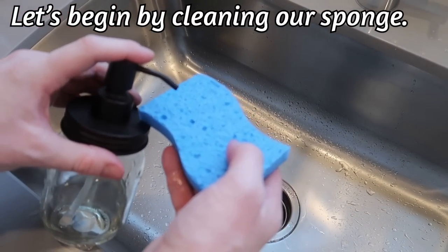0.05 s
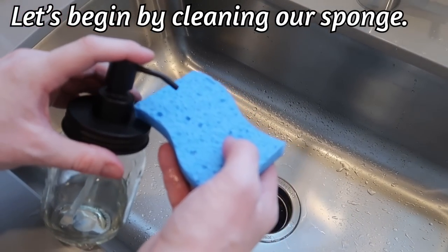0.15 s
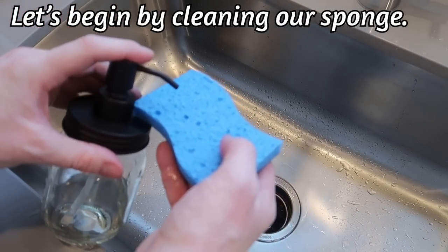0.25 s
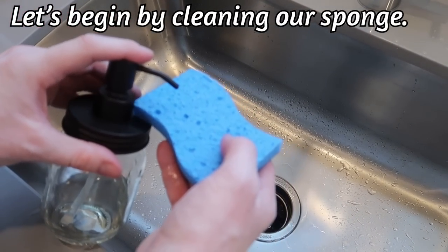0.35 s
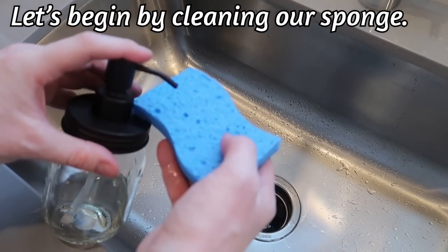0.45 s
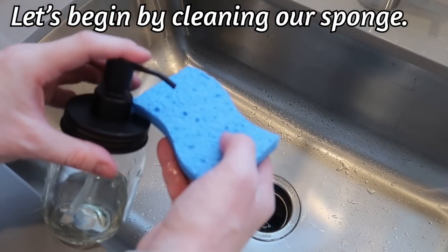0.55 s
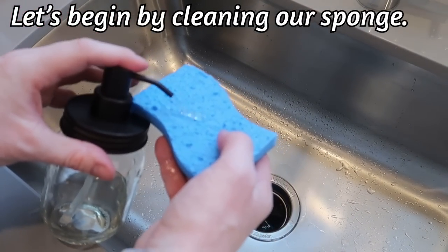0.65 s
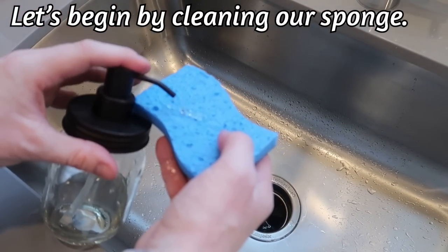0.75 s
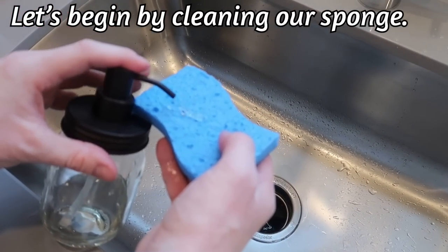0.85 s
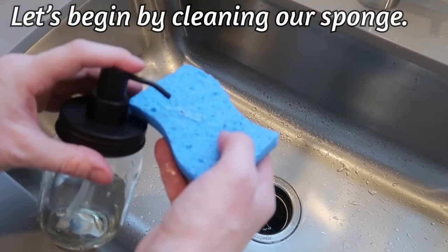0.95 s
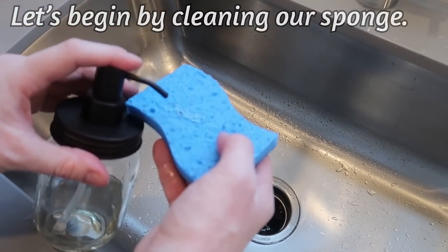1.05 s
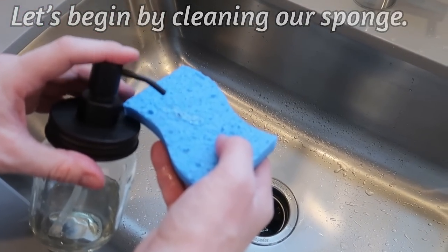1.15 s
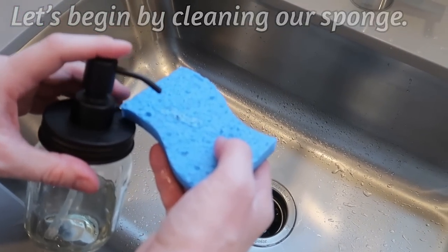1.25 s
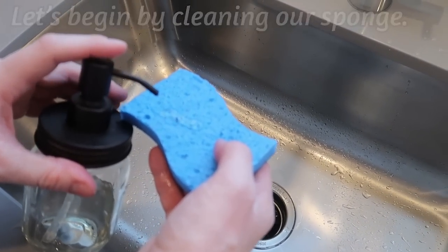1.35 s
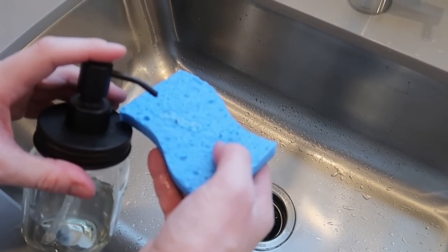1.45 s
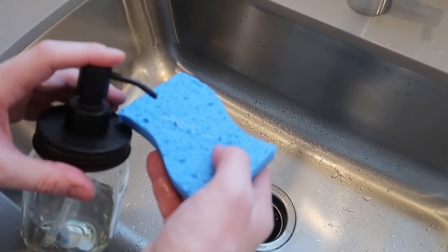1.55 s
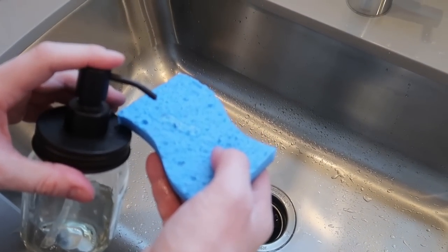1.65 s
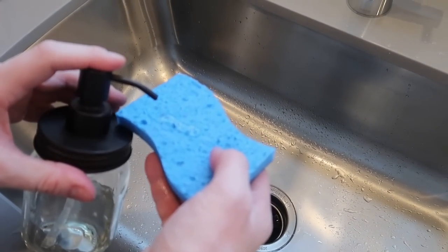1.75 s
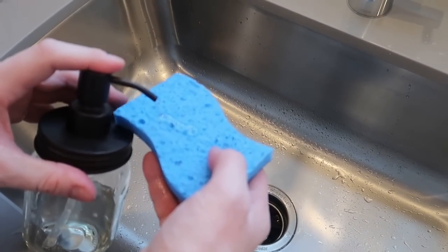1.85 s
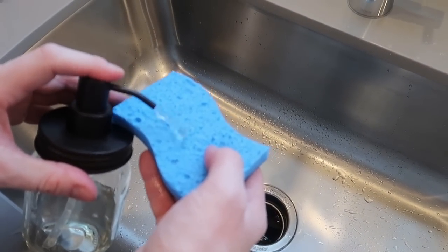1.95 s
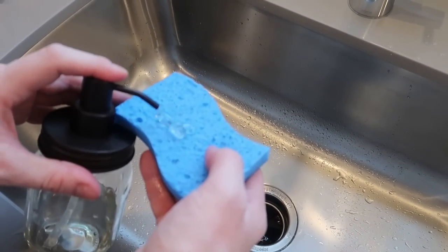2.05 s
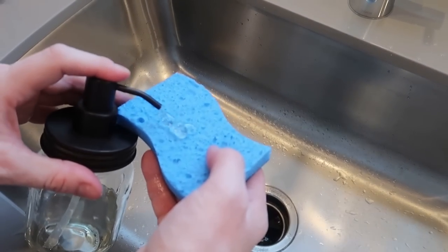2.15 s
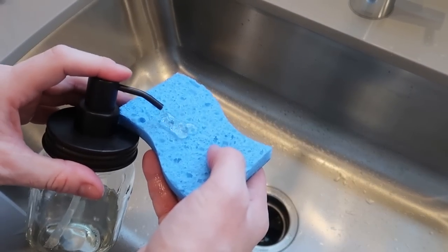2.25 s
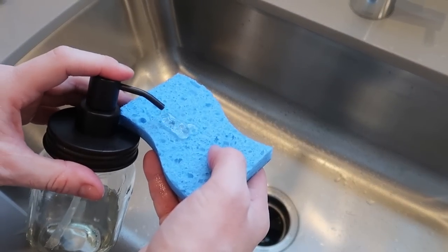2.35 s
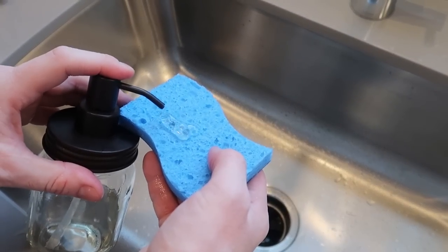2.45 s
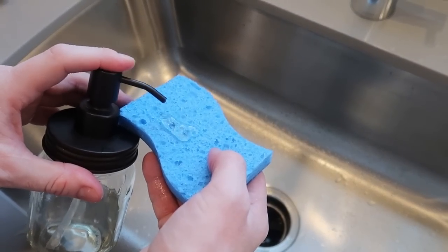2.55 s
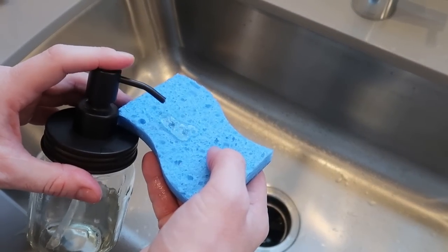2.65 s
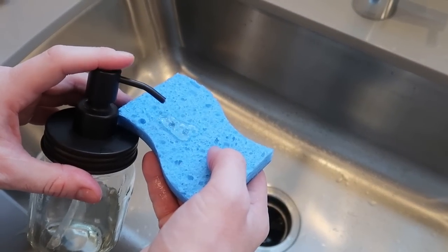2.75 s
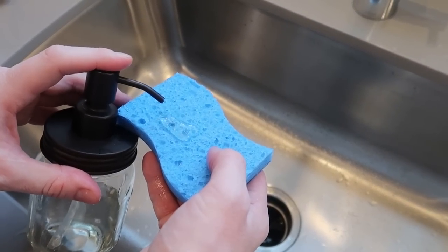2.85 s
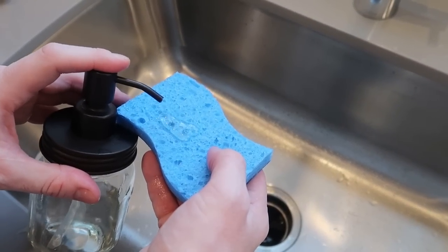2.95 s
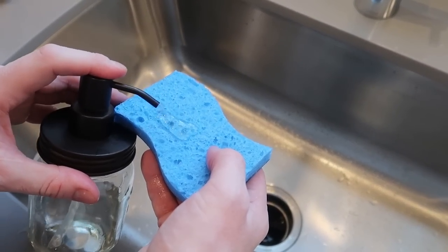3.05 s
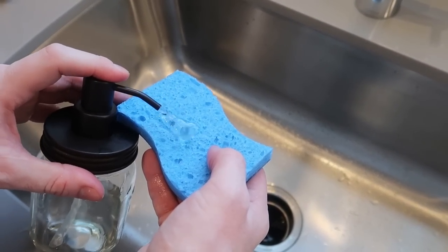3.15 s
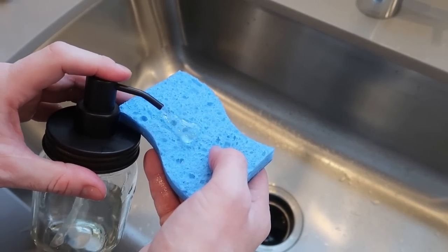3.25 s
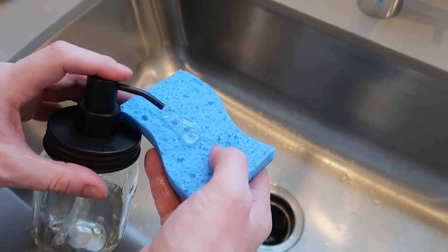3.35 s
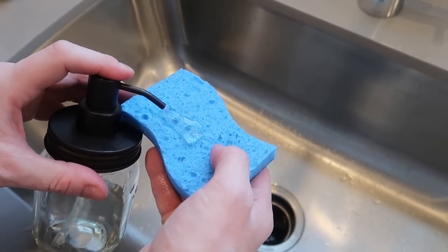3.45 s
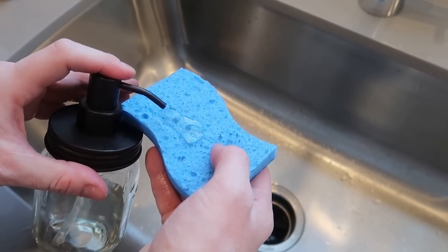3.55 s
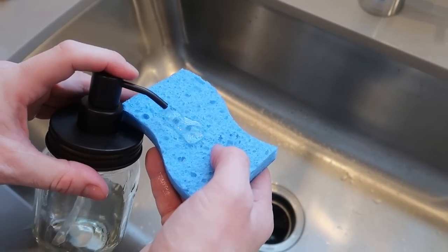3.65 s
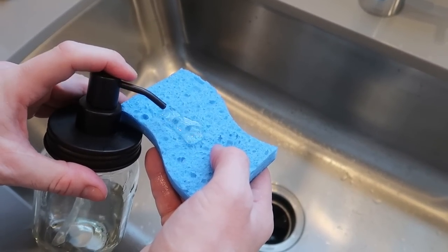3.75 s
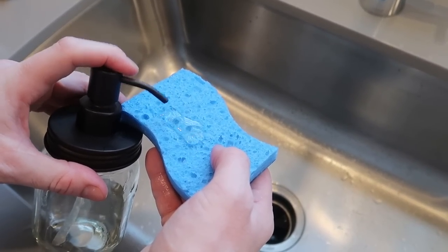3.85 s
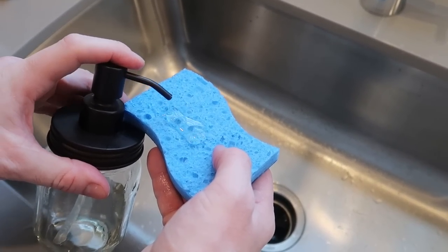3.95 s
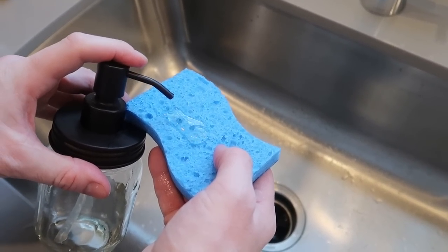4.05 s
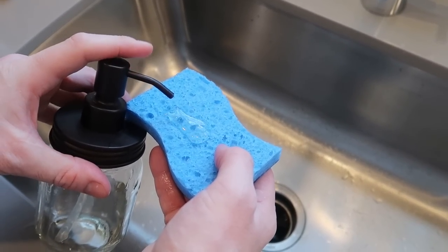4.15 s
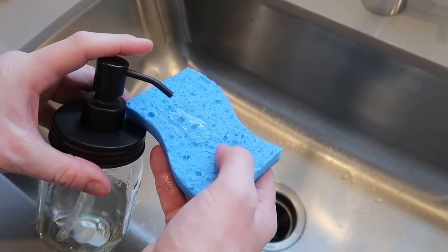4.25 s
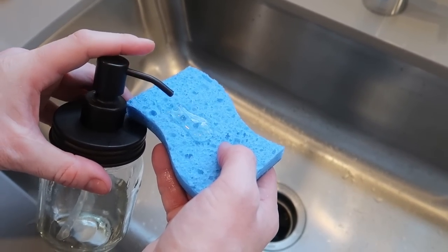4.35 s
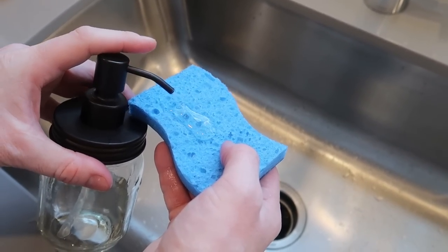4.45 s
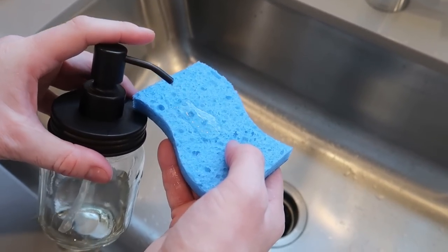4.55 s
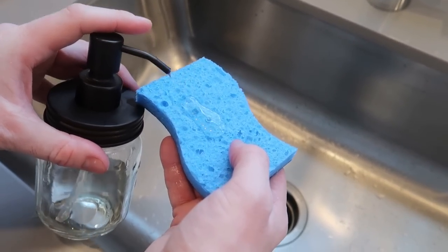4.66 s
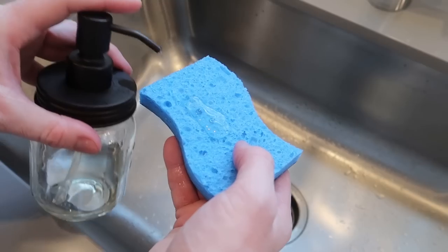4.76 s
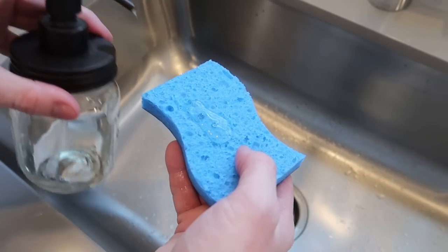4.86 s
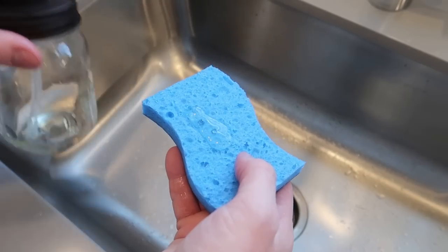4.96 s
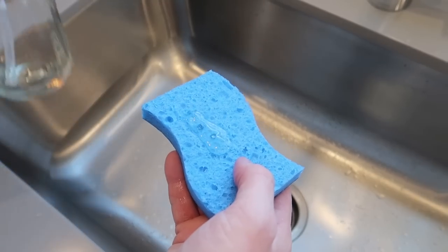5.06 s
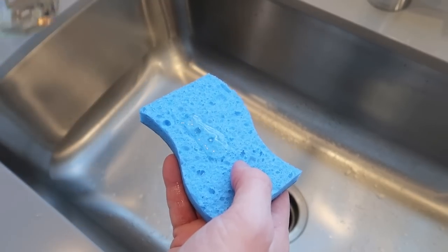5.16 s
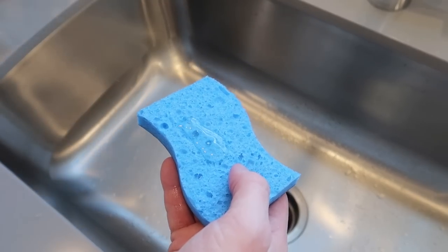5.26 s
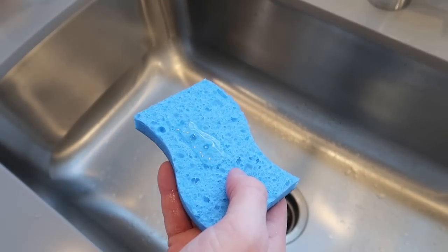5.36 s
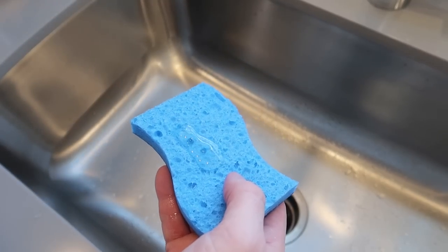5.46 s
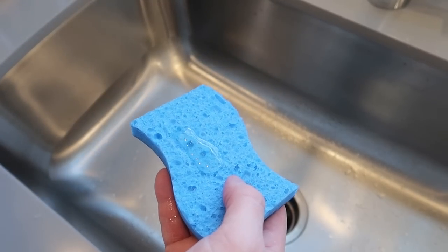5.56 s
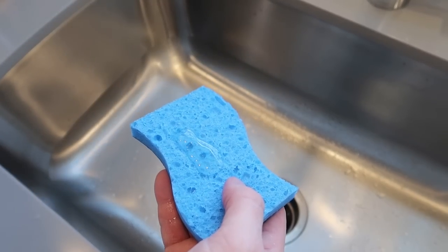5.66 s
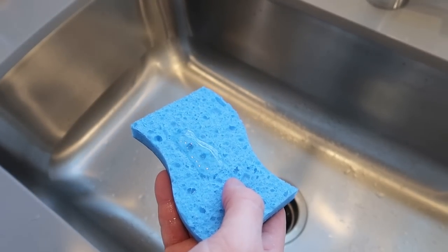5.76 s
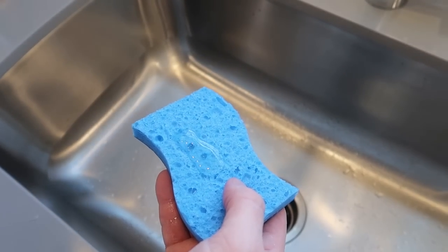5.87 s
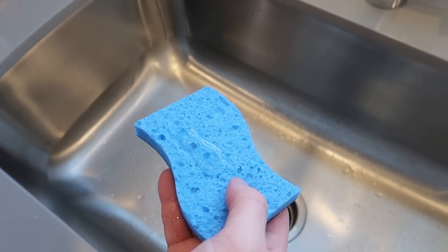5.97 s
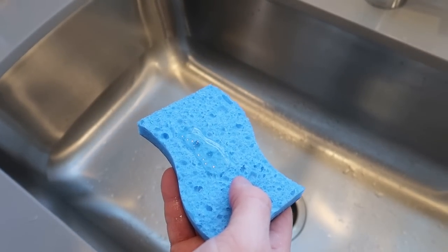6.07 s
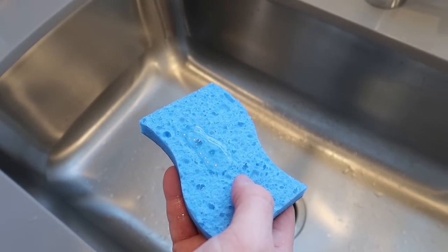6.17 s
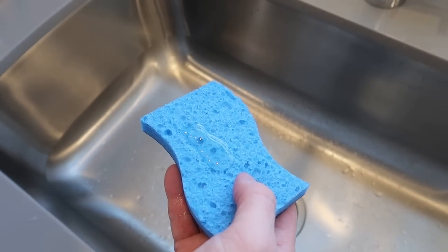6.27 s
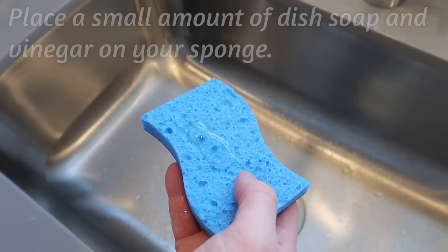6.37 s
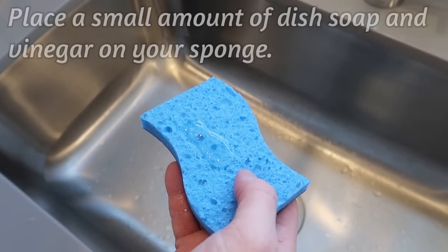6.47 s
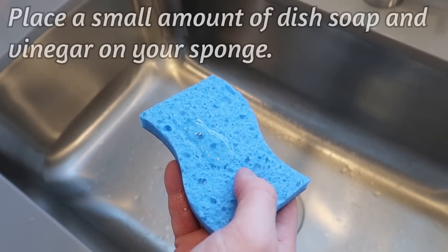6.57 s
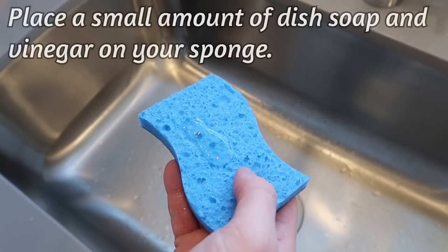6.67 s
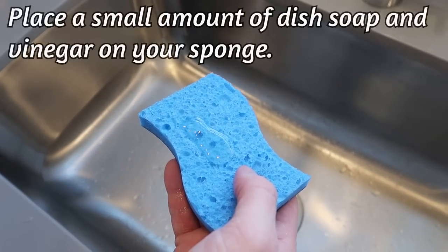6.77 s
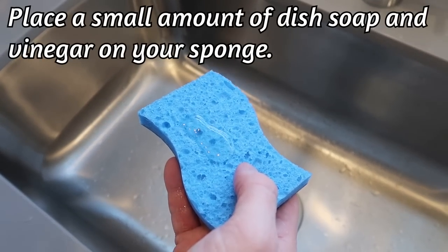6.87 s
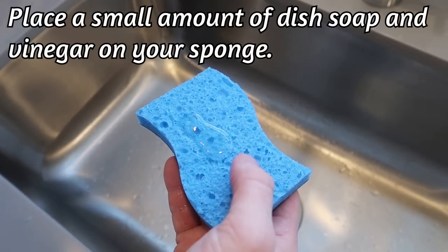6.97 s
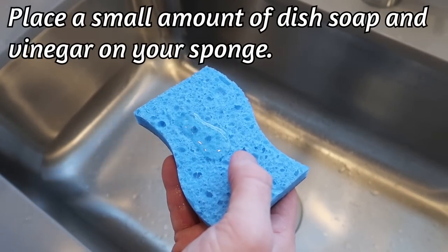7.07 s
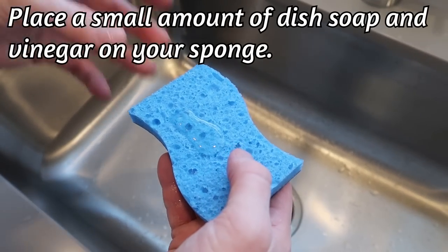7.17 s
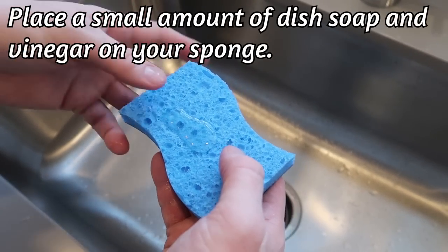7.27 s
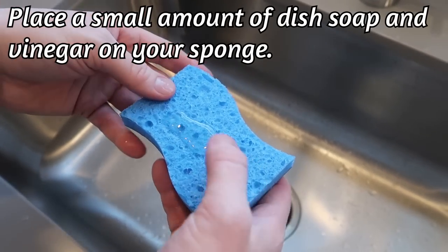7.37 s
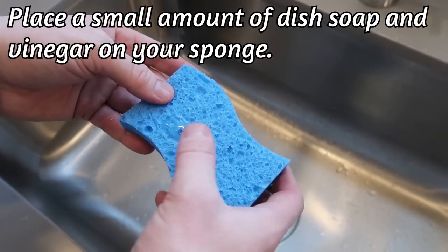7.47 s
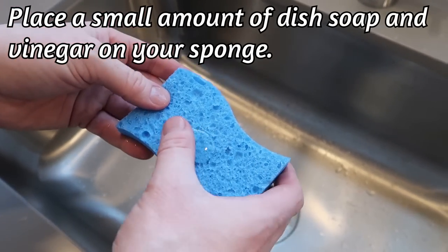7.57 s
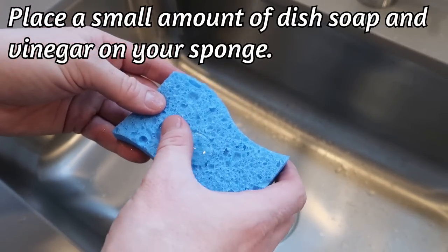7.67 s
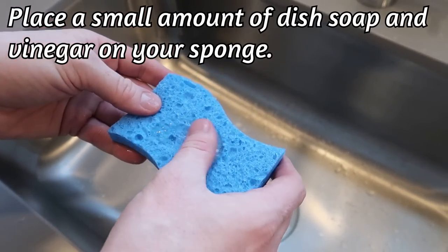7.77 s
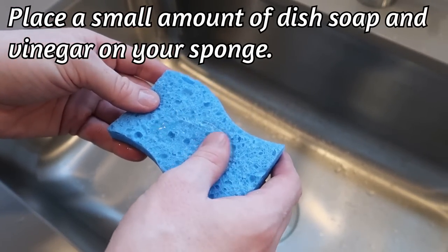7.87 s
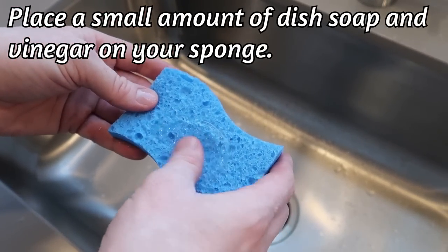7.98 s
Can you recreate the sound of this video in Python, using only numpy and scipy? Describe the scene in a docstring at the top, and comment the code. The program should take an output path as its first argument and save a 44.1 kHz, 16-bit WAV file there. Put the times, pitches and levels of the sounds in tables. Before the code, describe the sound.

Plastic soap pump clicks and scrapes over a steel sink with dull basin knocks, then a jar lands hard on the counter, over faint fridge hum.

```python
"""A quiet kitchen, a glass jar with a soap pump over a steel sink, two microphone ports close together.
From the start a fridge hums, jar and hands bump the basin (decaying modes) and its floor booms (a low sine).
Then the pump is pressed several times with clicks and short knocks (shaken resonators), scrapes (grains)
and spits of the valve (hiss bands); the spring twangs and basin and jar ring singly (shivering sines).
Near 6.4 s the jar is set down hard on the counter and rocks; hum and room air go on to the end."""
import sys
import numpy as np
from scipy import signal
from scipy.fft import rfft, irfft
from scipy.io import wavfile
from scipy.ndimage import uniform_filter1d

SR = 44100
rng = np.random.default_rng(int(sys.argv[2]) if len(sys.argv) > 2 else 0)


def file_out(sig):
    """Save sig as 16-bit WAV at sys.argv[1]."""
    # one column per channel
    cols = np.atleast_2d(sig).T
    # limit, then scale
    lim = np.clip(cols, -1, 1)
    pcm = np.round(lim * 32767).astype(np.int16)
    wavfile.write(sys.argv[1], SR, pcm)


N = 353682  # samples, about 8 s
T = np.arange(SR // 2) / SR  # half a second of time, for single sounds


def undb(db):
    """Decibels to gain."""
    return 10 ** (np.asarray(db, float) / 20)


def fade(t, t60):
    """Decay that loses 60 dB in t60 seconds (1 ms at least)."""
    return np.exp(-np.log(1000) * t / np.maximum(t60, 1e-3))


def band(x, hz, octaves):
    """Band-pass around hz."""
    edges = hz * 2. ** (np.array([-octaves, octaves]) / 2)
    edges = np.clip(edges, 10, SR / 2 - 500)
    return signal.sosfilt(signal.butter(2, edges, "bandpass", fs=SR, output="sos"), x)


def on_log(table, hz):
    """Read (Hz, value) points on a log-frequency axis."""
    f, v = np.transpose(table)
    return np.interp(np.log(np.maximum(hz, 1)), np.log(f), v)


def walk(rate):
    """Random levels held 1 / rate s and slewed twice; spread 1."""
    k = int(SR / rate)
    steps = np.repeat(rng.standard_normal(N // k + 1), k)
    slewed = uniform_filter1d(uniform_filter1d(steps, k), k)[:N]
    return slewed / slewed.std()


def add(out, s, sound, db):
    """Mix a sound in at s seconds with its peak at db."""
    i = max(int(s * SR), 0)
    sound = sound[:N - i]
    out[i:i + len(sound)] += sound * undb(db) / np.abs(sound).max()


# Clicks and short knocks of plunger, basin and set-down, dry:
# start_s, peak_db, pitch_hz (struck), clack_db (broad part, before peak scaling)
CLICKS = [(.667, -51, 3620, -20), (0.6772, -31, 2040, -13), (0.683, -13, 3210, -11),
          (0.6853, -18.5, 3400, -10.5), (.695, -31, 3370, -12), (.71, -39, 3400, -20),
          (.725, -47, 3400, -20), (.755, -49, 3350, -20), (.775, -45, 3400, -20), (1.087, -46, 3140, -7.5),
          (1.154, -38.5, 3060, -3), (1.169, -47, 3170, -7), (1.237, -38, 2740, -7),
          (1.258, -43.5, 2100, -12), (1.289, -49, 3030, -6), (1.950, -21.5, 3270, -12),
          (1.950, -33.5, 1520, -15), (1.954, -29.5, 3050, -3), (1.958, -36, 3550, -15),
          (1.958, -40, 2700, -13), (1.951, -36, 1970, -19), (2.047, -34.5, 3000, -21),
          (2.0477, -23.5, 880, -32), (2.048, -40, 2000, -20), (2.055, -46, 3300, -6),
          (2.436, -47, 2500, -2), (2.555, -45.5, 3240, -15), (2.598, -32, 4300, -6.5),
          (2.6013, -26.5, 3250, -9), (2.603, -36.5, 1480, -24), (2.611, -33, 1280, -8),
          (2.601, -40, 5300, -23), (2.6, -39, 2680, -20), (2.607, -30, 3700, 5), (2.615, -39, 4200, 2),
          (2.618, -35, 1850, -3), (3.126, -27, 1210, -14.5), (3.1265, -34.5, 2970, -17),
          (3.128, -30.5, 3800, -17), (3.135, -47, 3680, -13), (3.163, -48, 3320, -8),
          (3.197, -52, 3500, -1), (3.216, -29.5, 1900, -19), (3.214, -20, 960, -23),
          (3.216, -32, 3130, -20), (3.223, -47, 3440, -12), (3.215, -42, 4250, -22), (3.739, -49, 3460, -4),
          (3.960, -44, 2000, -7), (3.968, -47, 3050, -6), (3.98, -52, 2000, -18), (3.982, -53, 3050, -18),
          (4.127, -61, 3050, -20), (4.395, -51, 3050, -20), (4.395, -54, 4180, -20),
          (4.395, -54, 5280, -20), (4.42, -59, 5270, -8), (4.617, -51, 3050, -13), (4.81, -57, 3370, -10),
          (5.0, -51, 3170, -6), (5.13, -54, 3500, -8), (6.315, -50, 3530, -13), (6.3991, -22, 2200, -23),
          (6.403, -34, 4400, -20), (6.411, -37, 4400, -20)]
# Modes of the plastic pump head: pitch_hz, width_hz, level_db (when struck at that pitch)
SHELL_MODES = [(1010, 70, 4), (1530, 130, 1.5), (2000, 45, 10), (2580, 190, 5.5), (3046, 74, 4),
               (3440, 70, -4.5), (3600, 100, 1.5), (4040, 62, -10.5), (5200, 180, -1.5)]
SHELL_DB, SHELL_DB_PER_OCTAVE = 0.5, 24  # the modes near the struck pitch answer most
SHELL_WIDTH_HZ = 790
CLACK_HZ, CLACK_OCTAVES = 1700, 2.7
RATTLE_T60_S = 0.001
# Fingers creak faintly on the plastic while the jar is held
CREAKS, CREAK_SPAN_S, CREAK_HZ = 45, (0, 5.3), (2800, 5500)
CREAK_FLOOR_DB, CREAK_SCATTER_DB = -58, 1.5  # softest creak, mean rise above it


def finger_creaks():
    """Faint clicks at random times and pitches; louder ones are exponentially rarer."""
    return [(np.interp(when, (0, 1), CREAK_SPAN_S),
             CREAK_FLOOR_DB - CREAK_SCATTER_DB * np.log(1 - rarity),
             np.interp(pitch, (0, 1), CREAK_HZ), -10)
            for when, rarity, pitch in rng.random((CREAKS, 3))]


def clicks():
    """A tick and a 1 ms rattle shake a band at the struck pitch, the shell modes and a broad clack."""
    out, t = np.zeros(N), T[:5000]
    for s, db, hz, clack_db in CLICKS + finger_creaks():
        shake = 0.32 * rng.standard_normal(len(t)) * fade(t, RATTLE_T60_S)
        shake[:3] += 1.2  # the tick
        octaves = np.log2(1 + SHELL_WIDTH_HZ / hz)
        shell = band(band(shake, hz, octaves), hz, octaves)
        for mode_hz, width_hz, mode_db in SHELL_MODES:
            answer_db = SHELL_DB + mode_db - SHELL_DB_PER_OCTAVE * abs(np.log2(mode_hz / hz))
            resonator = signal.iirpeak(mode_hz, mode_hz / width_hz, fs=SR)
            shell = shell + undb(answer_db) * signal.lfilter(*resonator, shake)
        clack = shake
        for _ in range(3):
            clack = band(clack, CLACK_HZ, CLACK_OCTAVES)
        add(out, s, band(shell, hz, 2.2 * octaves) + undb(clack_db) * clack, db)
    return out


# Soap and air spit through the valve: start_s, low_peak_db, high_peak_db (before the port lean), t60_ms
SPITS = [(0.6824, -60, -27, 12), (0.686, -36, -41, 90), (.87, -75, -55, 25), (1.949, -41.5, -53, 30),
         (2.600, -58, -51, 56), (3.123, -40, -40, 40), (3.128, -55, -26.5, 19), (3.128, -37.5, -45, 105),
         (3.214, -42, -56, 20), (3.96, -56, -46, 21), (3.968, -43, -59, 140), (4.395, -62, -75, 30),
         (4.85, -53, -55, 30), (6.317, -54, -80, 23), (6.4, -37.5, -55, 25)]
# The low and the high hiss: pitch_hz, width_octaves (of each of two passes)
VALVE = [(6400, 1), (11900, 0.41)]
# Left then right port: lean_db, delay_s (one sample later on the right)
SPIT_PORTS = [(.8, 0), (-.8, 1 / SR)]


def spits():
    """Short turbulent hisses, nearer the left port; each port hears part of them alone."""
    out, t = np.zeros((2, N)), T[:6000]
    for s, *hiss_db, t60_ms in SPITS:
        envelope = (1 - fade(t, 0.0016)) * fade(t, t60_ms / 1000)
        both, *own = rng.standard_normal((3, len(t))) * envelope
        for port, (lean_db, late_s) in enumerate(SPIT_PORTS):
            puff = both + 1.5 * own[port]
            for (hz, width), db in zip(VALVE, hiss_db):
                add(out[port], s + late_s, band(band(puff, hz, width), hz, width), db + lean_db)
    return out


# The plunger and fingers slide on plastic: start_s, length_s, level_db (before the band-passes)
SCRAPES = [(0.672, 0.033, -42), (1.08, 0.13, -74), (1.21, 0.076, -62), (1.966, 0.1, -65.5),
           (2.038, 0.022, -63), (2.598, 0.027, -51), (3.121, 0.021, -50), (3.148, 0.036, -56),
           (3.206, 0.019, -48), (3.946, 0.042, -62), (4.38, 0.064, -71), (4.74, 0.13, -69),
           (4.946, 0.23, -75)]
SCRAPE_HZ, SCRAPE_OCTAVES, SCRAPE_GRAIN_DB = 3100, 0.69, 2.5


def scrapes():
    """Friction as dense uneven grains that come and go with each slide."""
    t, gain = np.arange(N) / SR, 0
    for s, length, db in SCRAPES:
        gain = gain + undb(db) * np.sin(np.pi * np.clip((t - s) / length, 0, 1)) ** .5
    grains = rng.standard_normal(N) * undb(SCRAPE_GRAIN_DB * walk(400))
    slide = band(grains * gain / grains.std(), SCRAPE_HZ, SCRAPE_OCTAVES)
    slide = band(slide, SCRAPE_HZ, 2 * SCRAPE_OCTAVES)
    return slide * np.sqrt(SR / SCRAPE_HZ / SCRAPE_OCTAVES)  # makes up for the narrow band


def shivering(hz, t60):
    """One ringing mode, shaken by loose parts."""
    shiver = 1 + 4 * uniform_filter1d(rng.standard_normal(len(T)), size=300)
    return shiver * fade(T, t60) * (1 - fade(T, 0.011)) * np.sin(2 * np.pi * hz * T)


# The spring snaps back: start_s, peak_db (dry)
TWANGS = [(2.607, -48.5), (3.965, -42.5)]
# Modes of the spring: pitch_hz, level_db (relative), t60_s
SPRING = [(4160, -5, 0.13), (5360, -1, 0.22), (6100, -1, 0.059), (6550, -1, 0.13), (7750, -17, .05),
          (8860, -12, .05)]


def spring_twangs():
    """A released spring rings in all of its modes at once."""
    out = np.zeros(N)
    for s, db in TWANGS:
        add(out, s, sum(undb(mode_db) * shivering(hz, t60) for hz, mode_db, t60 in SPRING), db)
    return out


# Single rings of basin and jar: start_s, peak_db (dry), struck_hz (the nearest mode answers)
RINGS = [(0.089, -28, 560), (0.13, -36, 560), (2.6, -37, 1950), (2.6, -44, 1500), (2.618, -48, 1950),
         (2.608, -36.5, 560), (2.62, -39, 560), (2.64, -40, 560), (2.611, -37, 3025), (0.75, -28, 338),
         (1.9, -25, 338), (2.4, -27, 338), (3.089, -49, 1200), (3.134, -20, 255), (3.16, -27.5, 560),
         (3.133, -28.5, 560), (3.217, -19, 338), (3.215, -27.5, 900), (3.232, -30, 900),
         (3.241, -24.5, 338), (3.22, -40.5, 1500), (3.196, -36, 560), (3.742, -44, 1050),
         (3.96, -28.5, 1050), (3.973, -38, 560), (4.508, -32, 700), (4.52, -37, 700), (4.52, -36, 560),
         (6.401, -40.5, 6250), (6.709, -29, 700), (6.735, -37, 700)]
# Modes of basin and jar that ring singly: pitch_hz, t60_s
SINGLE_MODES = [(255, 0.079), (338, 0.14), (560, 0.085), (710, 0.059), (900, 0.067), (1050, 0.053),
                (1200, 0.055), (1500, 0.11), (1950, 0.049), (3025, 0.06), (6250, 0.06)]


def single_rings():
    """Single rings of basin and jar: each blow sounds the one mode nearest the struck pitch."""
    out, (hz, t60) = np.zeros(N), np.transpose(SINGLE_MODES)
    for s, db, struck_hz in RINGS:
        k = np.argmin(np.abs(hz - struck_hz))
        add(out, s, shivering(hz[k], t60[k]), db)
    return out


def ring(modes, extra_db, damping=1):
    """Decaying sines; every blow lands elsewhere, so signs and strengths differ."""
    hz, db, t60 = (c[:, None] for c in np.transpose(modes))
    luck = rng.standard_normal((2, len(modes), 1))
    gain = np.sign(luck[0]) * undb(db + extra_db + 1.5 * luck[1])
    return (gain * fade(T, t60 / damping) * np.sin(2 * np.pi * hz * T)).sum(0)


# Tops of the low and the middle ring: pitch_hz
RING_EDGES_HZ = [420, 860]


def blows(table, modes, tail, linger):
    """Each blow swells into clear modes and a dense crowd of weak ones; longer contact sounds duller."""
    out = np.zeros(N)
    linger_db, times_longer = linger
    for s, db, damping, low_db, middle_db, contact_ms, swell_ms in table:
        def lift(hz):
            return np.array([low_db, middle_db, 0])[np.searchsorted(RING_EDGES_HZ, hz)]
        damping = max(damping, .2)
        body = ring(modes, lift(np.transpose(modes)[0][:, None]), damping)
        for hz, tail_db, t60 in tail:
            crowd = band(rng.standard_normal(len(T)), hz, 0.88)
            # a weak part lingers, whatever the blow's damping
            decay = fade(T, t60 / damping) + undb(linger_db) * fade(T, times_longer * t60)
            body += undb(tail_db + lift(hz)) * decay * crowd / crowd.std() / 4
        swell = 1 - np.exp(-1000 * T / max(swell_ms, .1))
        soft = signal.butter(5, 1000 / np.clip(contact_ms, .1, 4), fs=SR, output="sos")
        add(out, s, signal.sosfilt(soft, body * swell), db)
    return out


# Bumps against the basin: start_s, peak_db (dry), damping (factor), low_ring_db, middle_ring_db (lifts)
BUMPS = [(0.002, -25.5, 0.81, -6, 9), (0.097, -23.5, 1.7, -1.5, 8), (0.367, -25.5, 1.04, -3, -1),
         (0.635, -24, 1.1, -9, 1.5), (0.644, -25, 1.1, 11, 4.5), (0.7298, -19, 4, 7, 5.5),
         (0.744, -24, 2.2, 15, 13), (1.087, -29, 0.88, 23, 8), (1.216, -35, 0.59, 15.5, 12.5),
         (1.244, -34, 1.5, 6, 7), (1.349, -27, 1.3, 0.5, 2.5), (1.828, -35.5, 0.2, 19.5, 10),
         (1.949, -28.5, 0.76, 3, 3), (1.955, -31, 3, 17, 0), (2.048, -20.5, 2, 6, 7.5),
         (2.45, -32.5, 0.79, 20, 12), (2.551, -34, 0.25, 17, 18), (2.723, -34.5, 1.7, 1, 3.5),
         (3.043, -35, 2.5, 22, 12), (3.078, -32.5, 1.2, 16, 8), (3.124, -22.5, 3.9, 4, -11),
         (3.132, -18.5, 2, 25, 9), (3.158, -28, 1.8, 17, 14), (3.189, -24, 1.3, 23, 14),
         (3.2152, -14.5, 2.3, 6.5, 0), (3.233, -24.5, 2.1, 3, 3), (3.739, -35, 2.5, 13, 1),
         (3.961, -28.5, 0.87, 6.5, 5.5), (4.155, -35, 1.8, -3, 5), (4.163, -32.5, 1.5, 3.5, 5),
         (4.286, -38.5, 1.8, -4, 3), (4.3, -45, 1.8, 6, 2), (4.503, -33, 1.7, 11, 13),
         (4.509, -30.5, 0.96, 13, 15.5)]
# Clear modes of the steel basin: pitch_hz, level_db (before the lifts), t60_s (at damping 1)
BASIN = [(261.6, 10, 0.15), (334.7, 1, 0.25), (563.6, 6.5, 0.12), (750, -6, 0.081), (895, -2.5, 0.094),
         (1020, -2, 0.25), (1122, -2, 0.079), (1517, -8.5, 0.19), (1920, -6, 0.088)]
# Its dense ring: pitch_hz, level_db (before the lifts), t60_s (at damping 1)
BASIN_TAIL = [(209, 15, 0.18), (345, 6.5, 0.36), (516, 8, 0.36), (730, 6, 0.21), (1106, 8.5, 0.25),
              (1700, 6, 0.063), (2800, -11, 0.048)]
BASIN_LINGER = (-16.5, 2.17)  # level_db, times longer
BUMP_CONTACT_MS, BUMP_SWELL_MS = 0.63, 0.64


def basin_bumps():
    """Jar and hands knock the steel basin, every bump with the same contact and swell."""
    bumps = [(*row, BUMP_CONTACT_MS, BUMP_SWELL_MS) for row in BUMPS]
    return blows(bumps, BASIN, BASIN_TAIL, BASIN_LINGER)


# The basin floor booms when weight shifts on it: start_s (of full swing), level_db (rms), hold_s
BOOM = [(0.06, -43.5, 0.11), (0.427, -44, .005), (0.554, -50, .005), (0.705, -43.5, 0.1),
        (1.128, -36, .005), (1.272, -36, 0.027), (1.49, -43.5, .005), (1.88, -48.5, 0.047),
        (1.991, -38.5, 0.027), (2.102, -41, 0.019), (2.493, -46, .005), (2.603, -36, 0.0044),
        (2.696, -38.5, 0.013), (3.08, -43, 0.0036), (3.164, -22, 0.094), (3.35, -38.5, .005),
        (3.766, -45, 0.042), (4.008, -31, 0.026), (4.115, -46, .01), (4.562, -40.5, 0.0045),
        (4.802, -46, .005), (6.446, -27.5, 0.0046), (6.53, -42, .005), (6.758, -48, .005)]
BOOM_HZ, BOOM_RISE_DB_PER_S, BOOM_FALL_DB_PER_S = 114, 318, 390


def boom():
    """The lowest mode of the basin swells, holds and dies, slightly unsteady in pitch."""
    t, gain = np.arange(N) / SR, 0
    for s, db, hold in BOOM:
        rise_db = BOOM_RISE_DB_PER_S * np.maximum(s - t, 0)
        fall_db = BOOM_FALL_DB_PER_S * np.maximum(t - s - hold, 0)
        gain = gain + undb(db - rise_db - fall_db)
    phase = 2 * np.pi * np.cumsum(BOOM_HZ * (1 + 0.012 * walk(12))) / SR
    return np.sqrt(2) * gain * np.sin(phase)


# The jar lands and rocks on the counter: start_s, peak_db (dry), damping (factor),
# low_ring_db, middle_ring_db (lifts), contact_ms, swell_ms
LANDINGS = [(6.3995, -3, 1.85, 5, 4.5, 0.43, 0.23), (6.41, -10, 2.6, -2.5, 2, 0.44, 0.76),
            (6.657, -33, 1.5, 17, 8, 0.5, 2.4), (6.671, -33.5, 1.8, 11, 5, 0.52, 2.4),
            (6.7065, -28, 1.5, 5, 9, 1.12, 1.6), (6.72, -29.5, 1.1, -6, 9, 0.74, 1.5),
            (6.92, -35.5, 1.1, 13, -1, 1.14, 15)]
# Clear modes of the counter: pitch_hz, level_db (before the lifts), t60_s (at damping 1)
COUNTER = [(132, 2.5, 0.19), (261, 2.5, 0.27), (480, -2, 0.15), (512, 1.5, 0.15), (567, -6, 0.37),
           (725, 0.5, 0.23), (881, -6, 0.3), (1004, 3, 0.28), (1089, 0, 0.21), (1212, 1.5, 0.2),
           (1420, -8, 0.15), (1445, -4, 0.13), (1618, -4, 0.15), (1760, -17, 0.15), (2010, -6, 0.14),
           (2255, 14, 0.03), (2400, -11, .12)]
# Its dense ring: pitch_hz, level_db (before the lifts), t60_s (at damping 1)
COUNTER_TAIL = [(158, 3.5, 0.09), (247, 17.5, 0.084), (424, 4.5, 0.1), (620, 11.5, 0.15),
                (1024, 15.5, 0.16), (1510, 12.5, 0.11), (2050, 13.5, 0.11), (3600, -6, .04)]
COUNTER_LINGER = (-12, 4.07)  # level_db, times longer


def counter_landings():
    """The jar hits the counter hard, then rocks; each contact excites the counter's modes."""
    return blows(LANDINGS, COUNTER, COUNTER_TAIL, COUNTER_LINGER)


ROOM_T60_S, ROOM_DB = 0.22, -12


def kitchen(x):
    """Short tiled-room tail of decaying noise; the ports differ only in its upper range."""
    mid, side = rng.standard_normal((2, len(T))) * fade(T, ROOM_T60_S) * (T > .003)
    side = 0.43 * band(side, 2700, 3.9)
    tails = np.array([mid + side, mid - side]) / np.sqrt((mid ** 2).sum())
    return x + undb(ROOM_DB) * signal.fftconvolve(x[None], tails, axes=1)[:, :N]


# Fridge compressor tones: pitch_hz, level_db (rms, before the waver)
HUM = [(59.2, -71), (118.4, -58.5), (236.9, -58.5), (296.1, -50.5), (452.2, -63), (479.1, -66.5),
       (602.9, -73.5), (839.8, -69.5)]


def hum():
    """Compressor tones that waver a little in level and phase."""
    t, out = np.arange(N) / SR, 0
    for hz, db in HUM:
        gain = np.sqrt(2) * undb(db + 1.4 * walk(9))
        cycles = hz * t + rng.random() + 0.015 * walk(2.5)
        out = out + gain * np.sin(2 * np.pi * cycles)
    return out


# Spectrum of the room air: pitch_hz, level_db (per Hz, relative)
AIR = [(12, -46), (20, -23.5), (65, -0.5), (119, -5.5), (208, -14.5), (226, -18.5), (267, -8), (299, -11),
       (325, -11), (454, -19), (568, -22.5), (862, -24), (4470, -35.5), (11500, -47), (15700, -57)]
# Difference between the ports: pitch_hz, level_db (side minus mid)
AIR_SIDE = [(30, -51), (150, -14), (500, -1.5), (2000, 1.5), (5000, 2), (15000, 0.5)]
AIR_DB = -48.5  # rms of the mid part


def air():
    """Noise shaped as room rumble, alike at both ports, under unrelated microphone hiss."""
    hz = np.arange(N // 2 + 1) * SR / N
    mid, side = rfft(rng.standard_normal((2, N))) * undb(on_log(AIR, hz))
    mid, side = irfft(mid, N), irfft(side * undb(on_log(AIR_SIDE, hz)), N)
    return undb(AIR_DB) / mid.std() * np.array([mid + side, mid - side])


def scene():
    """Hits in the room, with spits and boom dry, over the steady background."""
    handling = clicks() + scrapes() + spring_twangs() + single_rings()
    knocks = basin_bumps() + counter_landings()
    return kitchen(handling + knocks) + spits() + boom() + hum() + air()


DROOP_HZ, TOP_HZ = 14300, 15650


def record(dry):
    """The microphone droops in the last octave and the recorder cuts the top."""
    dry = signal.sosfilt(signal.butter(4, DROOP_HZ, fs=SR, output="sos"), dry)
    return signal.sosfilt(signal.ellip(10, .2, 80, TOP_HZ, fs=SR, output="sos"), dry)


dry = scene()
out = record(dry)
file_out(out)
```